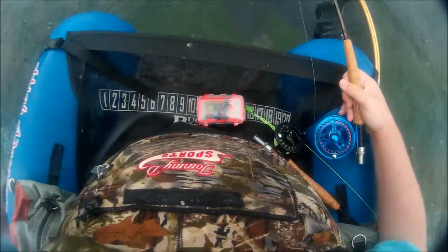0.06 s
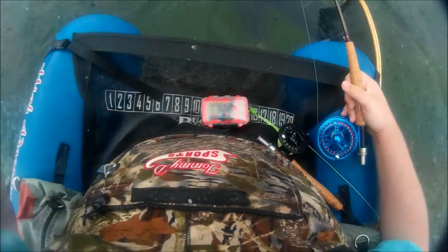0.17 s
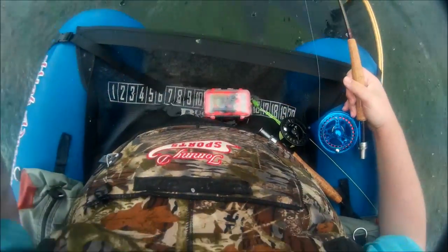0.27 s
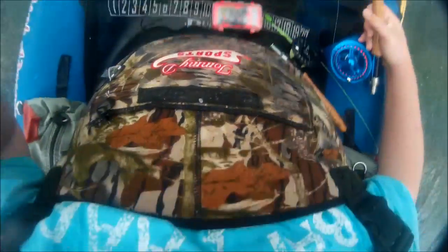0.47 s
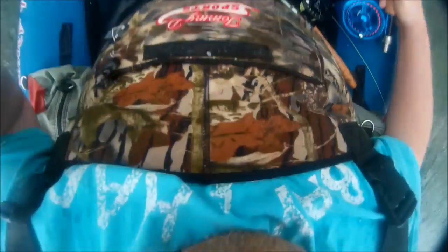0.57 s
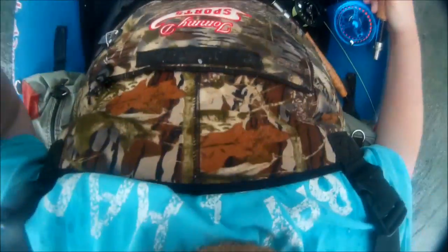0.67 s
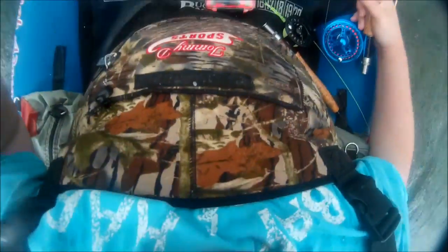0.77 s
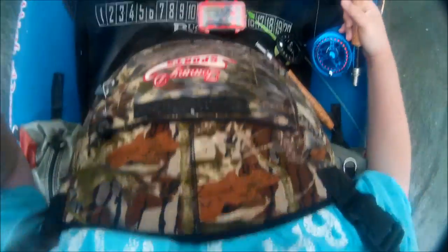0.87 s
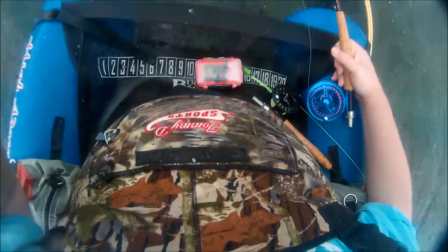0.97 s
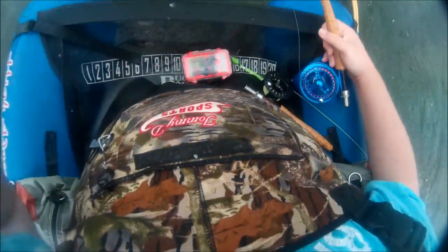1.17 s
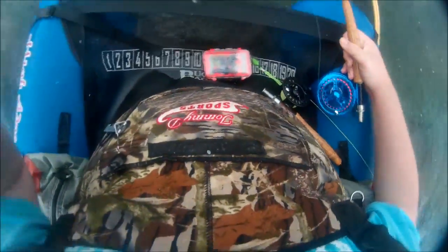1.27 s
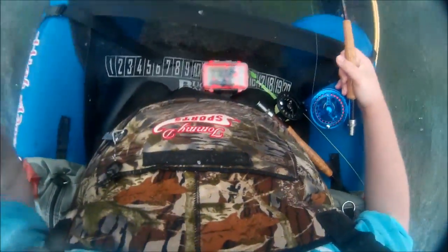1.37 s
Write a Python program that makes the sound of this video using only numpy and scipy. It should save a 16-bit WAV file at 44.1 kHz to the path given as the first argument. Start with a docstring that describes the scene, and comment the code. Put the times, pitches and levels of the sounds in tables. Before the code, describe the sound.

Sharp knocks of fishing gear bump a chest-worn microphone as an angler shifts on a calm lake. A thump and clack come first, then fabric rustle and two loud, briefly ringing hits, over low rumble and faint water.

```python
"""A dull thump and a clack break over faint lapping water: an angler shifts in a float tube on a quiet
lake. Tackle bumps the plastic case of a chest-worn microphone. Soft shoves rock its mount, sharp contacts
ring the case, and two hard hits set a buckle and the reel ringing and overload the input.
Clothing rubs between the knocks, over the low sway of the body."""
import sys
import numpy as np
from scipy import signal
from scipy.fft import rfft, irfft, next_fast_len
from scipy.io import wavfile

SR = 44100
rng = np.random.default_rng(int(sys.argv[2]) if len(sys.argv) > 2 else 0)


def waveform_to_disk(signal):
    """Save audio, clipped to [-1, 1], as 16-bit WAV at the path in sys.argv[1]."""
    frames = np.transpose(np.atleast_2d(signal))
    scaled = np.clip(frames, -1, 1) * 32767
    samples = np.round(scaled).astype(np.int16)
    wavfile.write(sys.argv[1], SR, samples)


N = 61739
T = np.arange(N) / SR

# still air over the lake (frequency [Hz], relative level [dB])
AIR_SPECTRUM = [(30, -14.5), (70, -5), (130, -7.5), (300, -10), (500, -10.5), (900, -17), (1800, -26),
                (3000, -26.5), (15000, -31)]
# swells of the wearer's low sway (time [s], level [dB])
SWAY_LEVELS = [(0, -47), (0.07, -44), (0.12, -67), (0.2, -39), (0.3, -48), (0.42, -44.5), (0.6, -54),
               (0.8, -49.5), (0.93, -35.5), (1.04, -40), (1.1, -39.5), (1.17, -35.5), (1.25, -44.5),
               (1.4, -52.5)]
# rumble of that sway (frequency [Hz], relative level [dB])
SWAY_SPECTRUM = [(10, -9.5), (22, 5), (34, -1.5), (50, -9.5), (110, -29), (250, -39.5), (800, -54)]
# rubbing of clothes and straps (time [s], level [dB])
RUB_LEVELS = [(0, -58), (0.17, -67), (0.195, -55.5), (0.24, -58.5), (0.26, -53), (0.28, -71), (0.30, -54.5),
              (0.35, -69), (0.372, -31), (0.398, -34.5), (0.412, -40), (0.46, -50), (0.485, -63),
              (0.53, -43), (0.558, -51.5), (0.58, -68.5), (0.80, -68.5), (0.825, -47.5), (0.85, -58),
              (0.872, -40), (0.91, -34), (0.93, -42.5), (0.955, -51.5), (1.0, -44), (1.05, -41.5),
              (1.075, -48.5), (1.11, -42), (1.135, -27.5), (1.17, -55), (1.25, -49.5), (1.29, -50.5),
              (1.31, -40.5), (1.335, -53), (1.37, -64.5), (1.4, -70)]
# tone of the rubbing (frequency [Hz], relative level [dB])
RUB_SPECTRUM = [(100, 4.5), (300, -4), (450, -1.5), (580, 4), (750, -10.5), (1000, -4.5), (1280, -1),
                (1850, -1), (2300, -13), (3000, -9), (4400, -24), (5500, -23.5), (8000, -38.5),
                (15000, -43)]
# soft shoves against the case (time [s], level [dB], push length [s])
SHOVES = [(0.2134, 6.5, 0.004226), (0.373, -7.5, 0.0081), (0.8553, -18.5, 0.0066), (0.921, -26.5, 0.0094),
          (1.0017, -16.5, 0.0044), (1.0077, -12, 0.0182), (1.12, -5.5, 0.0093), (1.131, -13, 0.004),
          (1.155, -24.5, 0.011), (1.299, -21.5, 0.0113)]
# light ticks of small fittings (time [s], level [dB])
FITTING_TICKS = [(0.9213, -38), (1.0442, -40.5)]
# ring of a fitting (frequency [Hz], relative level [dB], t60 [s])
FITTING_MODES = [(3650, 2, .005), (4950, 0, 0.0055), (7930, -4.5, .014)]
# tackle striking the case
# (time [s], level [dB], low cut [Hz], high cut [Hz], crack against ring [dB], crack decay [s])
CONTACTS = [(0.2134, -13, 350, 4500, -2.5, 0.0023), (0.2901, -31, 300, 2830, 1, 0.0021),
            (0.3118, -40, 1100, 2500, -3, 0.0015), (0.3662, -44, 400, 5000, -1, .002),
            (0.3762, -6, 850, 1290, -3.5, 0.0023), (0.3897, -4, 1350, 1370, -10, 0.0011),
            (0.8273, -38.5, 1110, 2200, -2, .002), (0.842, -25.5, 300, 700, -2, 0.002),
            (0.856, -21.5, 500, 3170, 1, 0.00093), (0.904, -25.5, 400, 1310, -1, .003),
            (1.0034, -1.5, 600, 6100, 1.5, 0.0013), (1.034, -35, 600, 1500, -3, .002),
            (1.1182, -14.5, 500, 2960, -1, 0.0016), (1.1199, -4, 1500, 4000, 0, 0.0023),
            (1.1239, -1.5, 1400, 5320, 3.5, 0.0033), (1.1270, -2, 1400, 4760, -1, 0.00058),
            (1.2665, -34, 151, 1000, -3, 0.0014), (1.2964, -18.5, 250, 970, -5, 0.0024),
            (1.303, -34, 300, 3000, 1, 0.0023), (1.322, -25.5, 250, 670, -1.5, 0.0027),
            (1.331, -35.5, 4600, 5500, 0.5, 0.013)]
# ring of the plastic case (frequency [Hz], relative level [dB], t60 [s])
CASE_MODES = [(291, -12, 0.046), (570, -16, .03), (726, -19.5, 0.023), (956, -21, 0.014),
              (1192, -2.5, 0.016), (1425, -6, .014), (1586, -6.5, 0.018), (1873, -4, .014),
              (2657, -15.5, 0.0098), (2920, -41, .016), (3843, -11.5, 0.016), (4580, -14, .01),
              (5370, -22.5, 0.0089), (6910, -20.5, 0.015)]
# crack of a contact (frequency [Hz], relative level [dB])
CRACK_SPECTRUM = [(100, -7), (300, 9), (700, -1.5), (1400, 10.5), (2400, -11), (4000, -5), (7000, -15.5),
                  (11000, -10), (16000, -21)]
# ring of the buckle (frequency [Hz], relative level [dB], t60 [s])
BUCKLE_MODES = [(2500, 3, .05), (2934, -6, .16), (3607, -12, .08), (3908, 0, .09), (4120, -7, .05),
                (6988, -14, .18), (7343, -16, .13), (7750, -16, .1)]
# successive bounces of the reel on the case (level [dB])
BOUNCE_LEVELS = [-11.5, 2.5, -2]
# hollow clack of each bounce (frequency [Hz], relative level [dB], t60 [s])
CHATTER_MODES = [(308, -2.5, 0.019), (480, -7, 0.011), (710, -0.5, .012), (958, -2, .012), (1394, 1, 0.012),
                 (1790, 1.5, 0.01), (3820, -8, 0.0097), (4670, -12, 0.0093)]
# ring of the reel (frequency [Hz], relative level [dB], t60 [s])
REEL_MODES = [(1534, 0, .12), (1744, -17, .11), (2503, -12, .053), (2950, -29, .25), (3451, -23, .17),
              (3908, -15, .081), (14900, -42, .2)]


def amp(db):
    """Decibels to gain."""
    return 10 ** (np.asarray(db) / 20)


def envelope(points):
    """Gain over time from (time [s], level [dB]) points."""
    return amp(np.interp(T, *np.array(points).T))


def colour(x, spectrum):
    """Equalise x by (frequency [Hz], level [dB]) points, rolled off below the first; rms 1."""
    hz, db = np.array(spectrum).T
    size = next_fast_len(len(x))
    freqs = np.maximum(np.fft.rfftfreq(size, 1 / SR), 1)
    gain = amp(np.interp(np.log(freqs), np.log(hz), db)) * np.minimum(freqs / hz[0], 1)
    shaped = irfft(rfft(x, size) * gain, size)[:len(x)]
    return shaped / np.std(shaped)


def ring(modes, size=16384):
    """Decaying sines of a struck object; neighbouring modes start in opposite directions."""
    t = T[:size]
    return sum((-1) ** k * amp(db) * np.sin(2 * np.pi * hz * t) * np.exp(-np.log(1000) * t / t60)
               for k, (hz, db, t60) in enumerate(modes))


def add(out, start, sound):
    """Mix a sound in at its start time."""
    i = int(np.clip(round(start * SR), 0, N - 1))
    out[i:i + len(sound)] += sound[:N - i]


def lake(air_db=-57.5, bubble_db=-58.5, bubbles_per_s=60, centre_hz=395, rise_per_s=5, t60=0.033):
    """A bed of still air; water laps at the tube in small bubbles that chirp upward as they fade."""
    out = amp(air_db) * colour(rng.standard_normal(N), AIR_SPECTRUM)
    t = T[:SR // 10]
    decay = np.exp(-np.log(1000) * t / t60)
    for when, pitch, strength in rng.random((int(bubbles_per_s * N / SR), 3)):
        hz = centre_hz * 2 ** (2 * pitch - 1)  # within an octave either way
        phase = 2 * np.pi * hz * (t + rise_per_s * t * t / 2)
        add(out, when * N / SR, amp(bubble_db) * 2 * strength * np.sin(phase) * decay)
    return out


def body_sway():
    """A low rumble swells and sinks as the wearer shifts."""
    return colour(rng.standard_normal(N), SWAY_SPECTRUM) * envelope(SWAY_LEVELS)


def cloth_rub(grain=0.28, grip_samples=64):
    """Fabric drags over the case in dense, uneven slips."""
    grip = np.repeat(rng.standard_normal(N // grip_samples + 1), grip_samples)[:N]
    slips = rng.standard_normal(N) * np.exp(grain * grip)
    return colour(slips, RUB_SPECTRUM) * envelope(RUB_LEVELS)


def mount_thumps(mount_hz=47.5, damping=1.496, softness=1.34):
    """Rounded shoves on the case; the mount gives way and swings back."""
    push = np.zeros(N)
    for start, db, length in SHOVES:
        pulse = np.abs(np.sin(np.pi * np.minimum(T / length, 1))) ** softness
        add(push, start, -amp(db) * pulse)
    omega = 2 * np.pi * mount_hz
    mount = signal.bilinear([1, 0, 0], [1, damping * omega, omega ** 2], SR)  # high-pass, Q = 1 / damping
    return signal.lfilter(*mount, push)


def fitting_ticks():
    """Small metal fittings tick with a tiny, bright ring."""
    out = np.zeros(N)
    for start, db in FITTING_TICKS:
        add(out, start, amp(db) * ring(FITTING_MODES))
    return out


def case_knocks(crack_rise_s=0.00027):
    """Each contact rings the case and cracks briefly, with its own low and high cut."""
    out = np.zeros(N)
    case = ring(CASE_MODES, size=4096)
    t = T[:len(case)]
    attack = 1 - np.exp(-t / crack_rise_s)
    for start, db, low_cut_hz, high_cut_hz, crack_db, decay_s in CONTACTS:
        crack = colour(rng.standard_normal(len(t)), CRACK_SPECTRUM) * attack * np.exp(-t / decay_s)
        knock = case + amp(crack_db) * crack
        dulled = signal.lfilter(*signal.butter(2, high_cut_hz, fs=SR), knock)
        thinned = signal.lfilter(*signal.butter(2, low_cut_hz, "high", fs=SR), dulled)
        add(out, start, amp(db) * thinned)
    return out


def buckle_ring(start_s=1.004, gain_db=-35):
    """The first hard hit leaves a buckle ringing, thin and high."""
    out = np.zeros(N)
    add(out, start_s, amp(gain_db) * ring(BUCKLE_MODES))
    return out


def reel_hit(chatter_s=1.1198, bounce_gap_s=0.00418, ring_s=1.1237, ring_db=-18):
    """The second hard hit: the reel chatters on the case in quick, even bounces and rings on."""
    out = np.zeros(N)
    for k, db in enumerate(BOUNCE_LEVELS):
        add(out, chatter_s + k * bounce_gap_s, amp(db) * ring(CHATTER_MODES))
    add(out, ring_s, amp(ring_db) * ring(REEL_MODES))
    return out


def scene():
    """Tackle, wearer and lake, mixed in mono at the chest microphone."""
    tackle = mount_thumps() + fitting_ticks() + case_knocks() + buckle_ring() + reel_hit()
    return (tackle + cloth_rub() + body_sway() + lake())[None]


def record(dry, top_hz=16300):
    """The hard hits clip the input at full scale; a steep low-pass trims the top."""
    low_pass = signal.ellip(10, 0.1, 90, top_hz, fs=SR, output="sos")
    return signal.sosfilt(low_pass, np.clip(dry, -1, 1))


dry = scene()
out = record(dry)
waveform_to_disk(out)
```